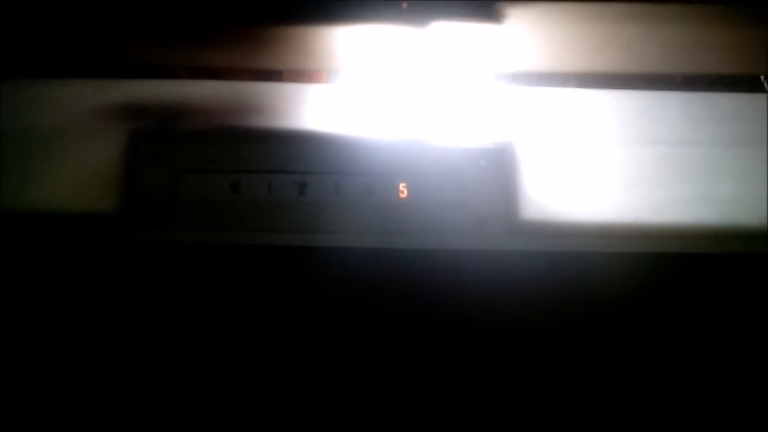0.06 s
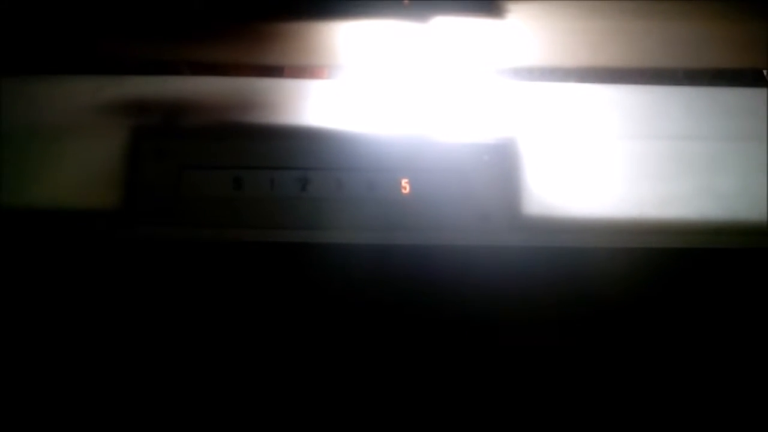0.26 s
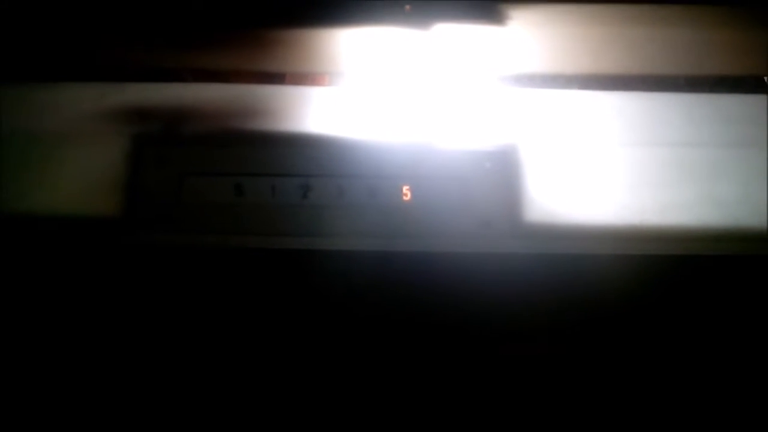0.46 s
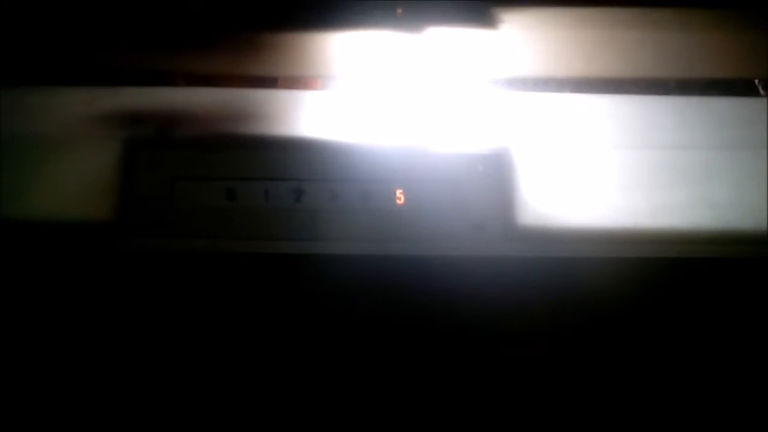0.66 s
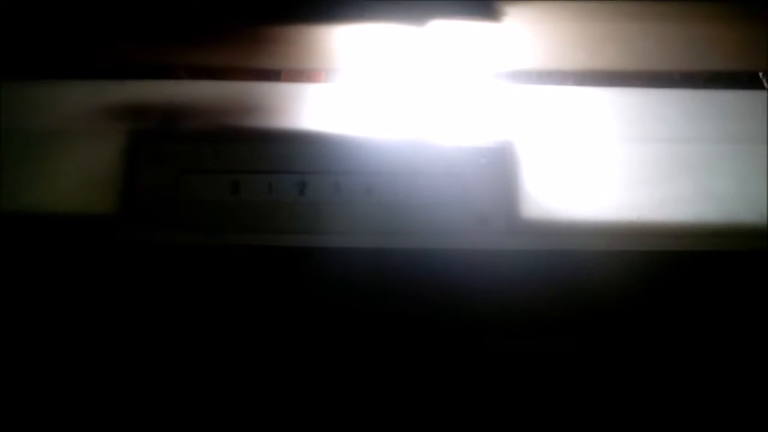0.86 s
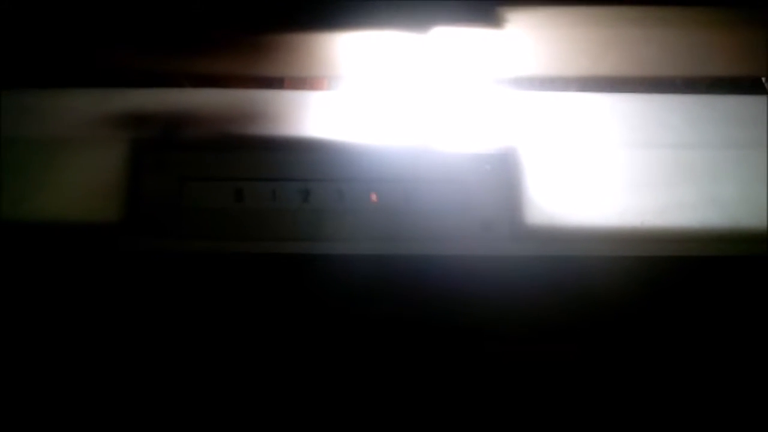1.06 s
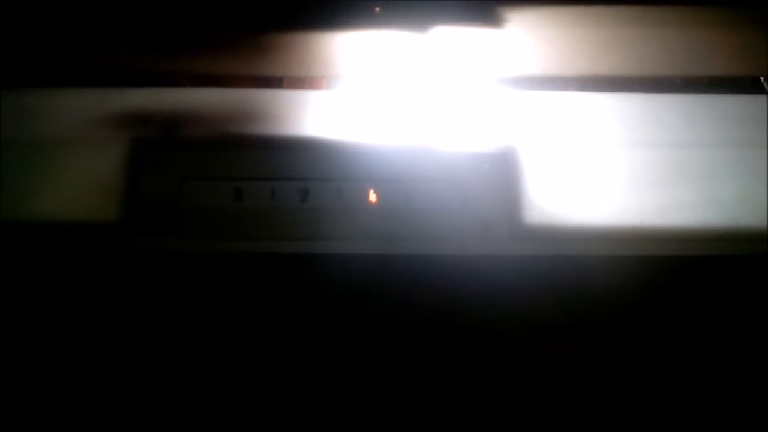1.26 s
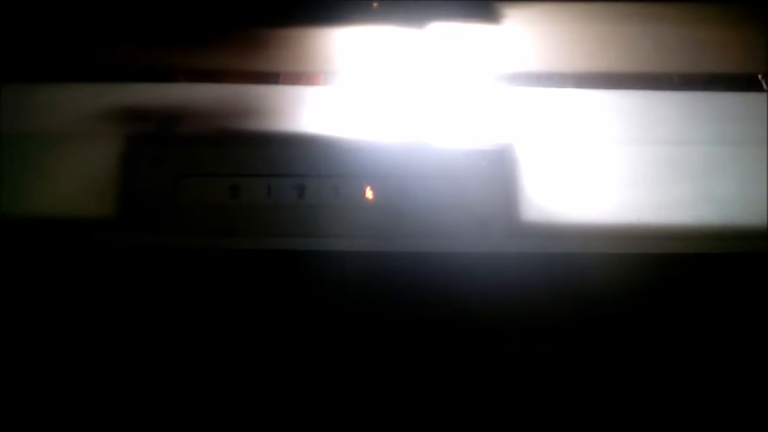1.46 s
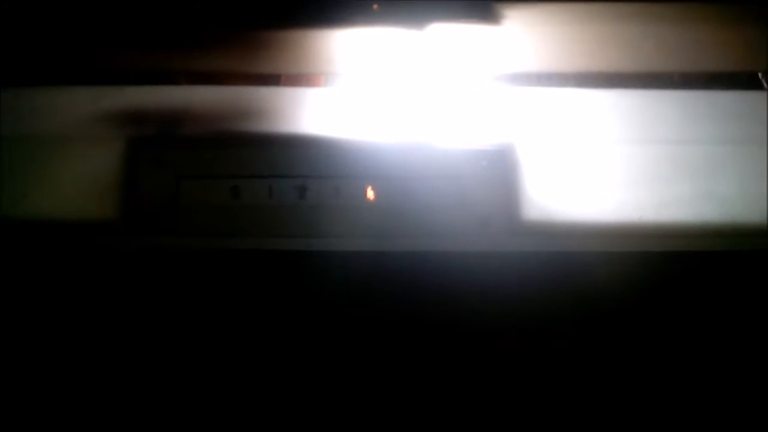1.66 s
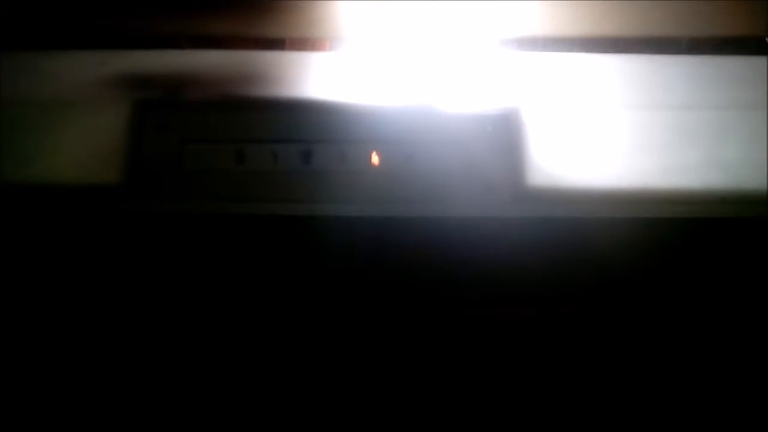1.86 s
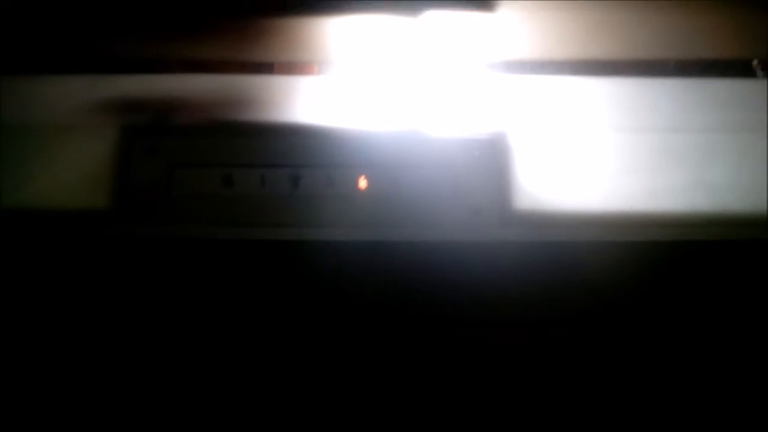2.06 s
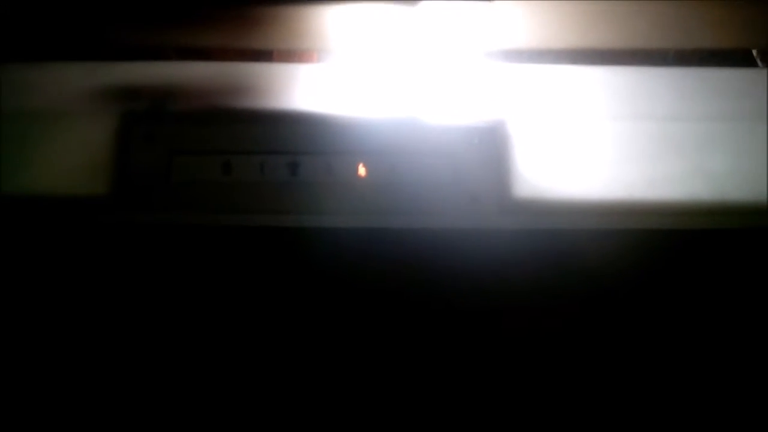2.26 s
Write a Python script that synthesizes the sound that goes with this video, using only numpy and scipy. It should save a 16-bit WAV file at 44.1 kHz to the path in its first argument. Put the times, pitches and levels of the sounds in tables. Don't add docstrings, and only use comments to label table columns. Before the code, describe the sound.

A lift cabin rumbles with a deep, pulsing boom near 90 Hz, over roller noise and soft ventilation hiss. Muffled knocks fall at about 0.16 and 0.42 s. A faint metal scrape squeaks at 0.8 s. At 1.77 s it scrapes back, and at 1.92 s a latch clacks loudly, rebounding and ringing with a low thud, before the rumble fades by 2.3 s. Small, dull microphone.

```python
import sys
import numpy as np
from scipy import signal
from scipy.fft import rfft, irfft, next_fast_len
from scipy.io import wavfile
from scipy.ndimage import uniform_filter1d, map_coordinates

SR = 44100
rng = np.random.default_rng(int(sys.argv[2]) if len(sys.argv) > 2 else 0)


def elevation(decibels):
    levels = np.asarray(decibels, float)
    return 10 ** (levels / 20)


def generate_wav(signal):
    frames = np.transpose(np.atleast_2d(signal))
    scaled = np.clip(frames, -1, 1) * 32767
    pcm = np.round(scaled).astype(np.int16)
    wavfile.write(sys.argv[1], SR, pcm)


N = 101429
T = np.arange(N) / SR


def unit(x):
    return x / np.sqrt(np.mean(x ** 2) + 1e-20)


def along(points, hz):
    f, v = np.transpose(points)
    return np.interp(np.log(hz + 1), np.log(f + 1), v)


def curve(rows):
    return np.interp(T, *np.transpose(rows))


def wobble(rate):
    knots = rng.standard_normal(int(N * rate / SR) + 4)
    return map_coordinates(knots, [np.arange(N) * rate / SR])


def filtered(x, response):
    m = next_fast_len(N + SR // 2)
    return irfft(rfft(x, m) * response(np.fft.rfftfreq(m, 1 / SR)), m)[:N]


def coloured(points):
    return unit(filtered(rng.standard_normal(N), lambda f: elevation(along(points, f))))


def resonant(body):
    def response(f):
        modes = 0
        for k, (hz, width, db) in enumerate(body):
            sign = (-1) ** k
            modes = modes + sign * elevation(db) * 1j * f * width / (hz * hz - f * f + 1j * f * width)
        rolloff = 1 + (f / body[-1][0] / 1.58) ** 4
        return modes * np.abs(modes) ** .5 / rolloff
    return unit(filtered(rng.standard_normal(N), response))


def bursts(rows, rise_s, fall_s):
    envelope = 0
    for start, db, hold in rows:
        rise = np.clip((T - start) / rise_s, 0, 1)
        fall_db = 60 * np.clip(T - start - hold, 0, None) / fall_s
        envelope = envelope + elevation(db - fall_db) * rise
    return envelope


def rings(rows, rise_s, fall_s, smear):
    tones = 0
    for start, db, hold, hz in rows:
        envelope = bursts([(start, db, hold)], rise_s, fall_s) * elevation(1 + 1.6 * wobble(30))
        tones = tones + envelope * np.sin(2 * np.pi * hz * T + smear * wobble(hz / 9))
    return tones


def cabin(x, wet_db):
    # (frequency [Hz], T60 [s])
    decay = [(100, 0.13), (500, 0.52), (1500, 0.28), (3000, 0.19), (6000, 0.28)]
    hz, t, z = signal.stft(rng.standard_normal(SR // 2), SR, nperseg=256)
    fade_db = -60 * t / along(decay, hz)[:, None]
    tail = signal.istft(z * elevation(fade_db), SR, nperseg=256)[1]
    return x + elevation(wet_db) * signal.fftconvolve(x, tail / np.linalg.norm(tail))[:N]


def slide(rows, body, wet_db):
    friction = resonant(body) * elevation(0.6 * wobble(140))
    return cabin(friction * bursts(rows, rise_s=.004, fall_s=0.054), wet_db)


def panel_boom():
    # (time [s], pitch [Hz])
    hum_pitch = [(0, 88.2), (.25, 84.81), (.55, 85.12), (.7, 97.23), (1.3, 95.9), (1.45, 91.66),
                 (1.65, 96.25), (1.85, 93.4), (2.3, 96.64)]
    # (frequency [Hz], width [Hz], level [dB])
    panels = [(94.5, 18, -2.5), (43, 9.3, -12.5), (124.8, 2.7, -9), (68.9, 4.2, -9)]
    # (time [s], level [dB])
    travel = [(0, -38), (.4, -41), (1.0, -36), (1.75, -37), (2.08, -34.5), (2.3, -52)]
    # (time [s], level [dB], length [s])
    jolts = [(.16, -36.5, 0.071), (.33, -38.5, 0.13), (.43, -31, 0.13), (.665, -35.5, 0.079),
             (.785, -32.5, 0.067), (.985, -35.5, 0.11), (1.195, -34.5, 0.19), (1.475, -35, 0.033),
             (1.61, -31.5, 0.044), (1.805, -28, 0.032), (1.87, -41, 0.027)]
    phase = 2 * np.pi * np.cumsum(curve(hum_pitch)) / SR
    hum = elevation(-1.5) * np.sin(phase + .7 * wobble(13))
    boom = hum + resonant(panels) * elevation(-1.0)
    swell = np.sqrt(np.abs(uniform_filter1d(boom ** 2, SR // 30)) + .02)
    boom = unit(boom / swell ** 0.89)
    return boom * (elevation(curve(travel)) + bursts(jolts, rise_s=0.02, fall_s=0.13))


def rollers():
    # (frequency [Hz], width [Hz], level [dB])
    frame_body = [(135, 60, 0.5), (200, 30, -1), (245, 5.3, -1), (303, 18, -1), (357, 48, -5),
                  (450, 45, -8)]
    # (time [s], level [dB])
    roll = [(0, -56), (.3, -61), (.42, -44.5), (.55, -32.5), (.7, -38.5), (.87, -33), (.91, -46.5),
            (.95, -41), (1.08, -37), (1.13, -63.5), (1.65, -60.5), (1.75, -44), (2.3, -60.5)]
    return resonant(frame_body) * elevation(curve(roll) - 11.5 + 0.39 * wobble(9.7))


def clack():
    # (time [s], level [dB], length [s])
    blows = [
        (1.918, -25, 0.018),
        (1.941, -27.5, 0.015),
        (1.98, -35.5, 0.025),
        (2.021, -50.5, 0.017),
    ]
    # (frequency [Hz], density [dB per Hz])
    rattle_tone = [(40, -7.5), (250, 0.5), (800, -8.5), (1300, -7), (2700, -13), (3600, -27), (4500, -64),
                   (15500, -100.5)]
    # (frequency [Hz], level [dB], T60 [s])
    steel = [(195.4, -23, 0.22), (251.8, -10, 0.35), (340, -18.5, 0.4), (509.7, -14, 0.17),
             (553.4, -9.5, 0.22), (598, -11, 0.35), (683, -16, 0.34), (796, -9.5, 0.23), (1102, -16, 0.22),
             (1220, -10, 0.31), (1340, -16, 0.33), (1796, -23.5, 0.26), (2076, -24, 0.24),
             (2616, -16.5, 0.14)]
    rattle = coloured(rattle_tone) * elevation(1.58 * wobble(400))
    blow = rattle * bursts(blows, rise_s=0.0073, fall_s=0.021)

    first_s, first_db, _ = blows[0]
    start = int(first_s * SR)
    ring = np.zeros(N)
    for hz, db, t60 in steel:
        swell = 0
        for hit_s, hit_db, _ in blows:
            t = np.clip(T[start:] - hit_s, 0, None)
            strike_db = hit_db - first_db + rng.normal(0, 3.0)
            swell = swell + elevation(strike_db - 60 * t / t60) * (1 - np.exp(-t / 0.014))
        tone = np.sin(2 * np.pi * hz * T + 1.08 * wobble(25 + hz / 12))
        ring[start:] += elevation(-17.5 + db) * swell * tone[start:]

    slam_s, slam_hz = 1.917, 88
    swing = bursts([(slam_s, -14, .066)], rise_s=.024, fall_s=0.063)
    swing = swing * np.sin(2 * np.pi * slam_hz * (T - slam_s))
    return cabin(blow, wet_db=-2.5) + ring + cabin(swing, wet_db=-14)


def latch_grind():
    # (time [s], level [dB], length [s])
    strokes = [
        (1.885, -46, 0.032),
        (1.914, -37, 0.027),
        (1.955, -42, 0.053),
        (2.02, -49.5, 0.08),
    ]
    # (frequency [Hz], width [Hz], level [dB])
    latch_body = [(604, 270, -4), (795, 68, -5.5), (1190, 220, -1.5), (1574, 260, -1.5), (2306, 340, -1.5),
                  (2710, 330, -3), (3110, 280, -6.5)]
    return slide(strokes, latch_body, wet_db=-3.5)


def cracks():
    # (time [s], level [dB], length [s])
    scuffs = [
        (1.90, -62.5, 0.016),
        (1.915, -45, 0.027),
        (1.948, -55, .014),
        (1.97, -61.5, 0.04),
        (2.018, -61.5, 0.018),
    ]
    # (frequency [Hz], density [dB per Hz])
    scuff_tone = [(1000, -31), (2000, 0.5), (3900, -2), (4500, -7.5), (6200, -11.5), (6800, -26),
                  (9000, -33.5), (15500, -49.5)]
    return cabin(coloured(scuff_tone) * bursts(scuffs, rise_s=0.0015, fall_s=0.015), wet_db=-11.5)


def slide_out():
    # (time [s], level [dB], length [s])
    scrape = [
        (.800, -56, 0.018),
        (.826, -49, .04),
        (.885, -55, 0.037),
    ]
    rub = [
        (.797, -70.5, 0.026),
        (.84, -78.5, 0.016),
    ]
    # (frequency [Hz], width [Hz], level [dB])
    scrape_body = [(1470, 150, -1.5), (1277, 120, -1.5), (2050, 220, -8), (2534, 140, -6.5),
                   (2750, 220, -11.5)]
    rub_body = [(3170, 280, -0.5), (4900, 600, -0.5), (6070, 810, -3)]
    return slide(scrape, scrape_body, wet_db=-12.5) + slide(rub, rub_body, wet_db=-6)


def slide_back():
    # (time [s], level [dB], length [s])
    creep = [
        (1.705, -65, .06),
    ]
    scrape = [
        (1.772, -54, 0.0028),
        (1.778, -43.5, 0.036),
        (1.815, -44, 0.042),
        (1.875, -46, 0.063),
    ]
    edge = [
        (1.774, -56.5, 0.044),
        (1.815, -57.5, 0.03),
        (1.85, -69.5, 0.048),
    ]
    squeal = [
        (1.772, -69, 0.045),
        (1.83, -79, 0.03),
    ]
    # (frequency [Hz], width [Hz], level [dB])
    creep_body = [(2300, 500, -6), (3050, 450, -4)]
    scrape_body = [(1334, 190, 0.5), (601, 170, -13), (2200, 290, -4)]
    edge_body = [(2650, 250, -6.5), (3080, 180, -1.5), (3460, 190, -6.5)]
    squeal_body = [(4200, 220, -2.5), (5550, 260, -1.5), (6830, 510, -5.5)]
    low = slide(creep, creep_body, wet_db=-2.5) + slide(scrape, scrape_body, wet_db=-2.5)
    high = slide(edge, edge_body, wet_db=-6) + slide(squeal, squeal_body, wet_db=-6)
    return low + high


def squeaks():
    # (time [s], level [dB], length [s], pitch [Hz])
    chirps_out = [(.801, -47, .004, 1540), (.811, -53, .008, 1530), (.823, -37, .011, 1530),
                  (.843, -44, .022, 1515), (.884, -54, .034, 1520), (.802, -59, .035, 2560),
                  (.848, -55, .02, 2560), (.88, -57, .022, 2580)]
    chirps_back = [(1.779, -46, .012, 1310), (1.798, -44, .012, 1300), (1.82, -51, .045, 1310),
                   (1.785, -54, .01, 2350), (1.81, -53, .03, 2200), (1.845, -53, .035, 2150),
                   (1.882, -52, .035, 2620), (1.835, -76, .035, 5300)]
    return cabin(rings([*chirps_out, *chirps_back], rise_s=.004, fall_s=.05, smear=.35), wet_db=-9)


def thumps():
    # (time [s], level [dB], length [s])
    knocks = [
        (.005, -54.5, 0.043),
        (.164, -47, 0.036),
        (.215, -58, 0.034),
        (.419, -43.5, 0.043),
        (.47, -50.5, 0.04),
    ]
    # (frequency [Hz], width [Hz], level [dB])
    knock_body = [(245, 68, -3), (417, 138, 1.5), (624, 190, -0.5), (830, 130, -1), (1150, 220, -5.5),
                  (1520, 300, -9), (1916, 450, -14)]
    return cabin(resonant(knock_body) * bursts(knocks, rise_s=0.009, fall_s=0.075), wet_db=-6.5)


def frame_tones():
    # (time [s], level [dB], length
    # [s], pitch [Hz])
    singing = [(0.205, -44.5, 0.046, 412), (0.18, -55, 0.064, 1150), (0.43, -45.5, 0.13, 410.4),
               (.44, -59, 0.013, 830), (.49, -54, 0.023, 554), (0.547, -50.5, 0.41, 245),
               (0.776, -46.5, 0.074, 303), (0.917, -49.5, 0.19, 303), (1.032, -52, 0.048, 405),
               (1.946, -38, 0.11, 145), (2.008, -41.5, 0.079, 42.8), (1.97, -36, 0.096, 256.5),
               (2.005, -44.5, 0.063, 340), (2.031, -55, 0.13, 1515), (2.035, -51, 0.099, 598)]
    more_tones = [
        (1.70, -45, 0.081, 145),
        (1.74, -38, 0.044, 66),
        (0.5, -50.5, .3, 200),
        (.64, -54.5, 0.039, 410),
    ]
    return rings([*singing, *more_tones], rise_s=0.044, fall_s=.12, smear=1)


def air():
    # (frequency [Hz], density [dB per Hz])
    hiss_tone = [(20, 4), (150, -2), (400, -17), (2000, -32.5), (5000, -47.5), (6500, -52), (8000, -67.5),
                 (15500, -87.5)]
    # (time [s], level [dB])
    draught = [(0, -2), (1.1, -2), (2.05, -1), (2.2, -11.5), (2.3, -10)]
    hiss = coloured(hiss_tone) * elevation(-42 + 1.6 * wobble(2.5))
    low = filtered(hiss, lambda f: 1 / (1 + (f / 500) ** 2))
    return hiss + low * (elevation(curve(draught)) - 1)


def electronics():
    # (frequency [Hz], level [dB rms])
    whines = [(12349, -95), (4845, -99), (9030, -110)]
    total = 0
    for hz, db in whines:
        level = np.sqrt(2) * elevation(db + .8 * wobble(20))
        total = total + level * np.sin(2 * np.pi * hz * T + .9 * wobble(70))
    return total


def lapse_tones():
    # (time [s], level [dB], length [s], pitch [Hz])
    blips = [(.06, -91, .02, 4100), (.06, -93, .02, 6200), (.3, -91, .02, 4845), (.595, -90, .04, 4845),
             (.595, -91, .03, 4050), (.595, -92, .025, 5500), (.6, -88, .03, 3250), (1.085, -90, .03, 4845),
             (2.085, -89, .035, 4845), (1.918, -86, .04, 9030)]
    return rings(blips, rise_s=.005, fall_s=.06, smear=.1)


def scene():
    ride = panel_boom() + rollers()
    latch = clack() + latch_grind() + cracks()
    slides = slide_out() + slide_back() + squeaks()
    frame = thumps() + frame_tones()
    return (ride + latch + slides + frame + air())[None]


def top_cut(x):
    return signal.sosfilt(signal.butter(12, 15480, fs=SR, output="sos"), x)


def record(dry):
    # (time [s], gain [dB])
    after_clack_gain = [(0, 0), (1.93, 0), (2.0, -3), (2.15, -2.5), (2.3, -1.5)]
    # (time [s], depth [dB], half length [s])
    lapses = [(.07, 7, .013), (.31, 8, .012), (.615, 16, .016), (1.1, 9, .012), (1.44, 7, .01),
              (2.1, 10, .007)]
    preamp_hiss = elevation(-88.5 + .9 * wobble(3)) * rng.standard_normal(N)
    x = dry[0] * elevation(curve(after_clack_gain)) + preamp_hiss
    treble = filtered(x, lambda f: 1 / (1 + (2900 / (f + 1)) ** 6))
    lapse_db = sum(db * np.exp(-((T - s) / half) ** 4) for s, db, half in lapses)
    x = x - treble * (1 - elevation(-lapse_db))
    mix = x + electronics() + lapse_tones()
    return top_cut(mix[None])


dry = scene()
out = record(dry)
generate_wav(out)
```